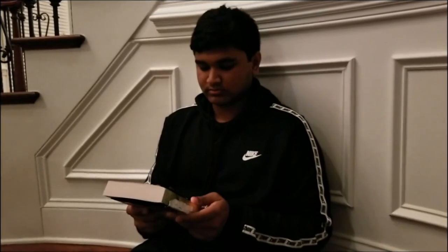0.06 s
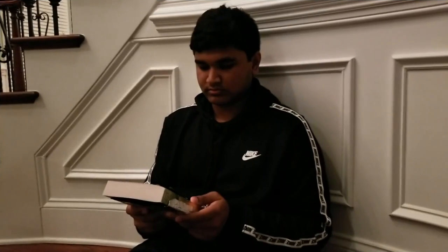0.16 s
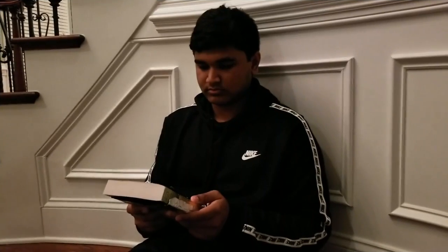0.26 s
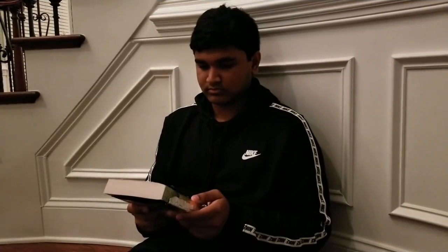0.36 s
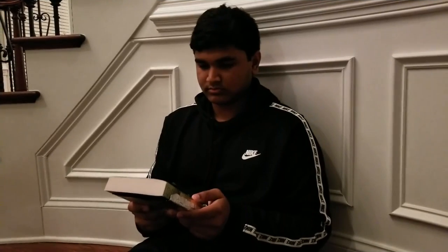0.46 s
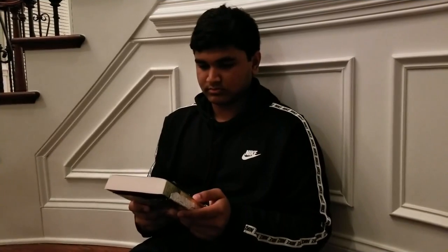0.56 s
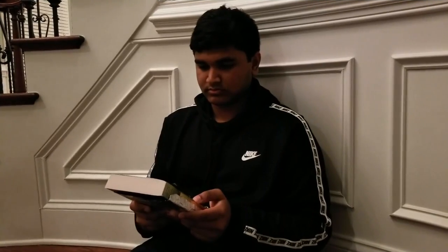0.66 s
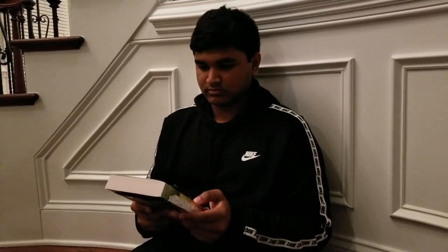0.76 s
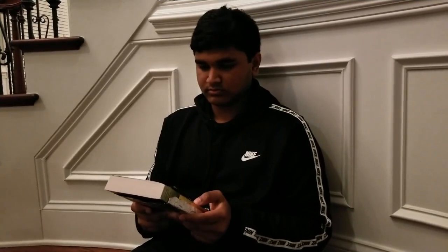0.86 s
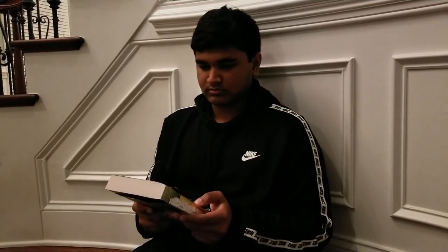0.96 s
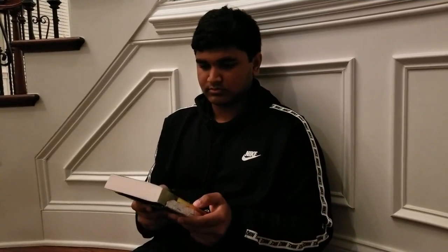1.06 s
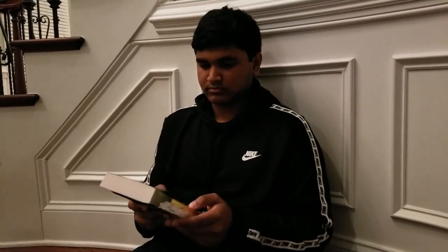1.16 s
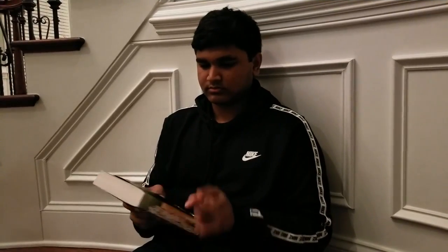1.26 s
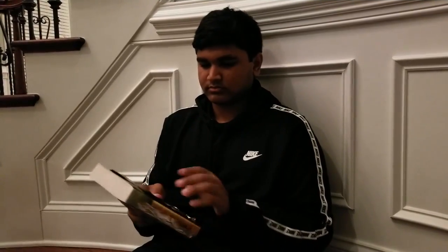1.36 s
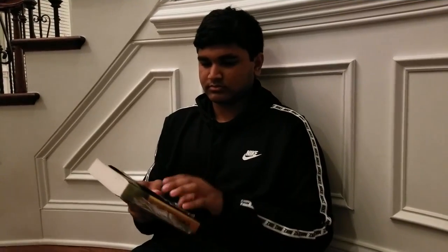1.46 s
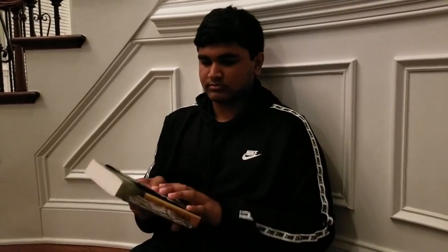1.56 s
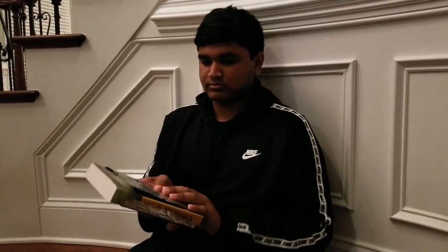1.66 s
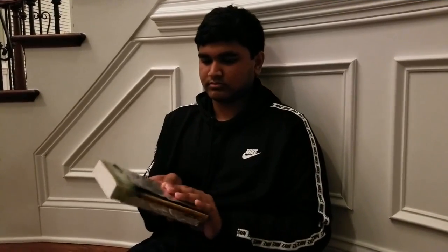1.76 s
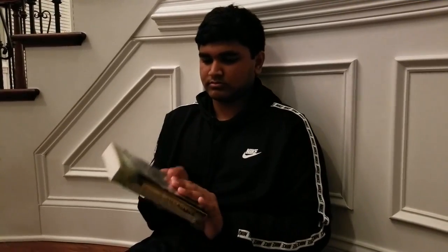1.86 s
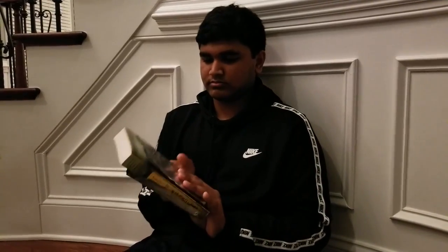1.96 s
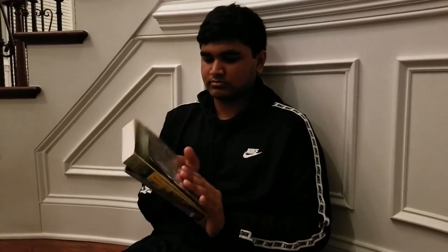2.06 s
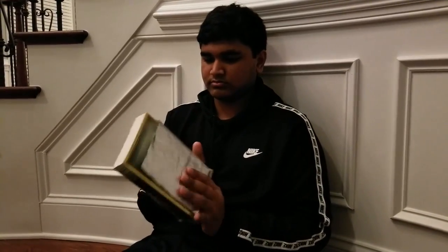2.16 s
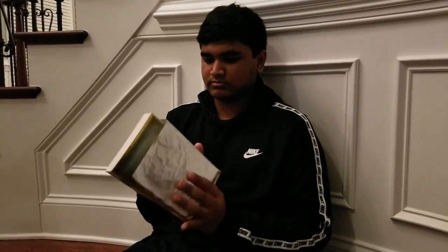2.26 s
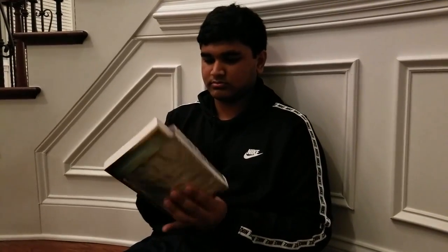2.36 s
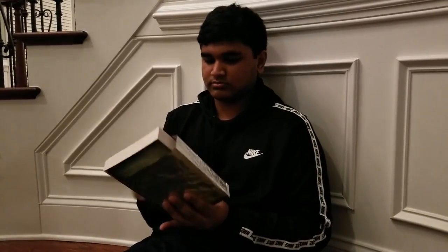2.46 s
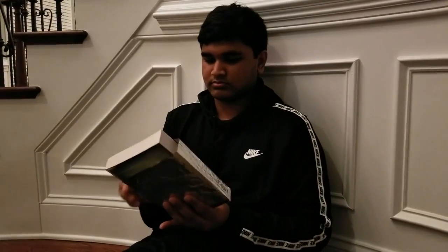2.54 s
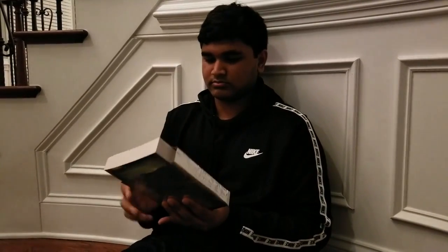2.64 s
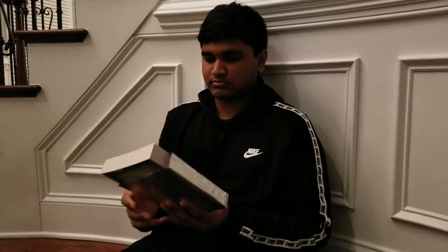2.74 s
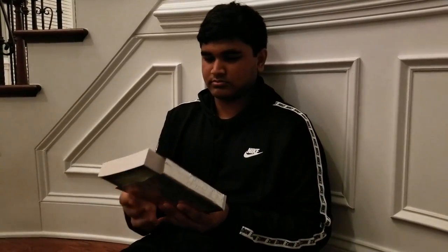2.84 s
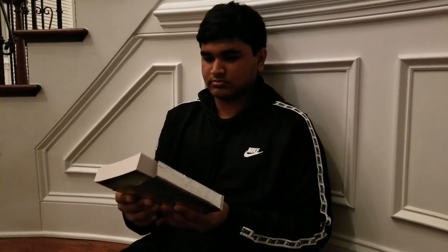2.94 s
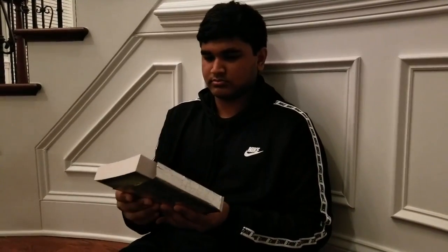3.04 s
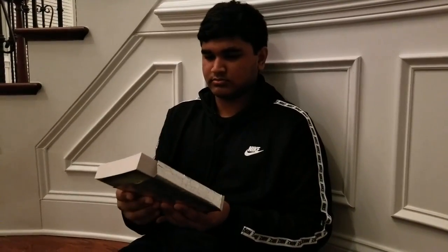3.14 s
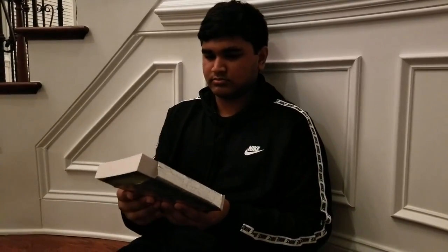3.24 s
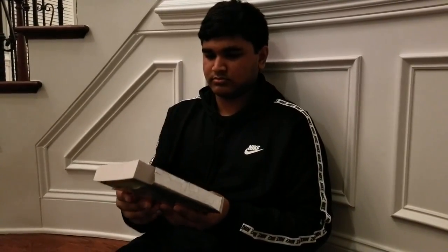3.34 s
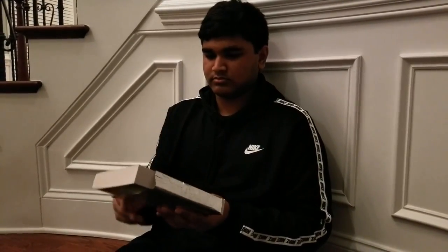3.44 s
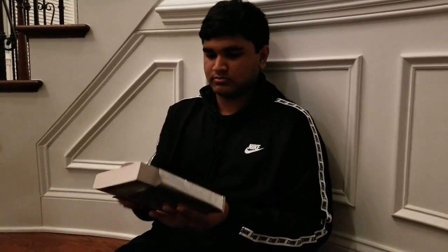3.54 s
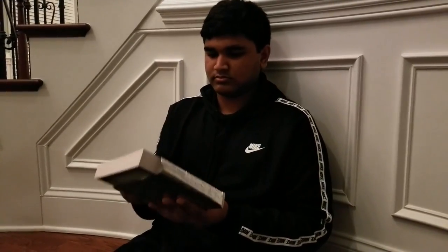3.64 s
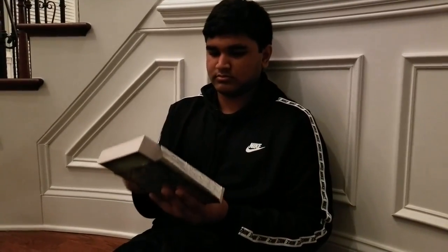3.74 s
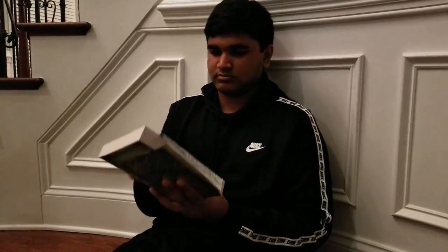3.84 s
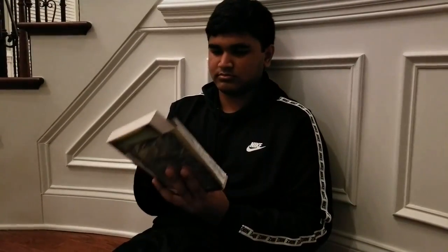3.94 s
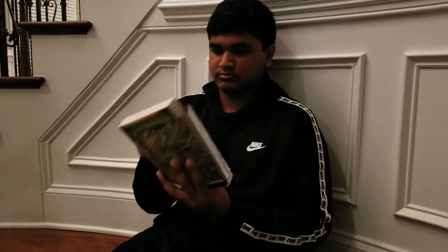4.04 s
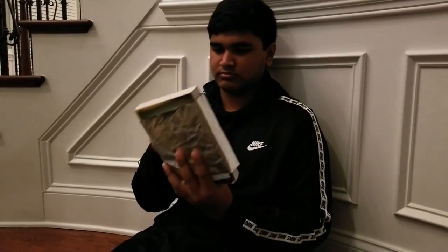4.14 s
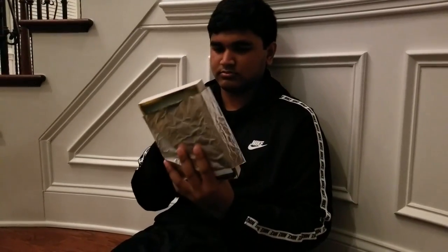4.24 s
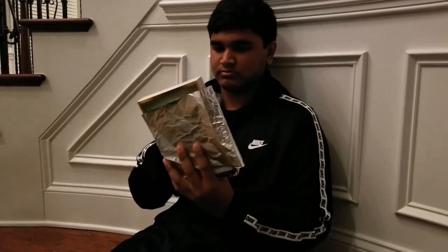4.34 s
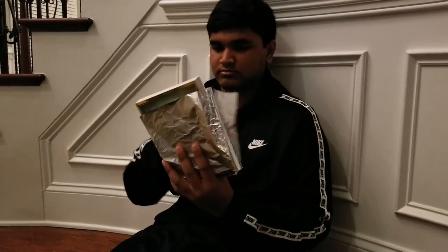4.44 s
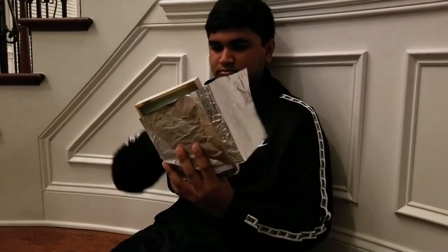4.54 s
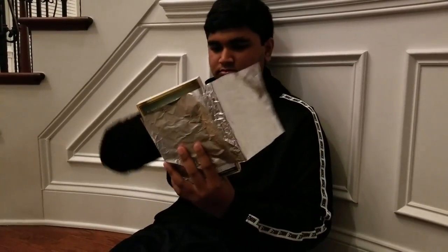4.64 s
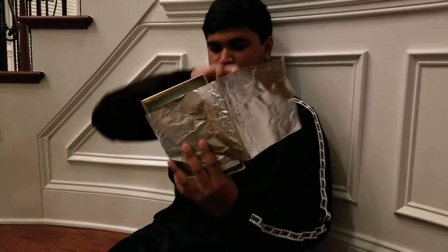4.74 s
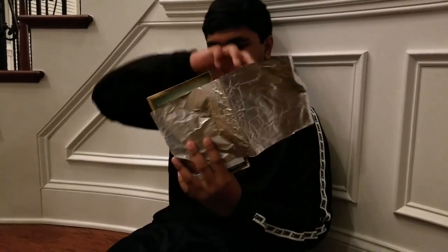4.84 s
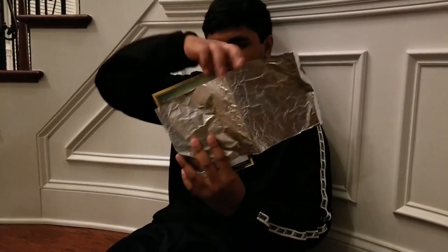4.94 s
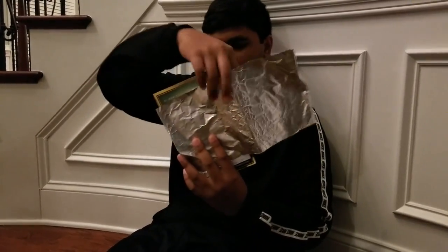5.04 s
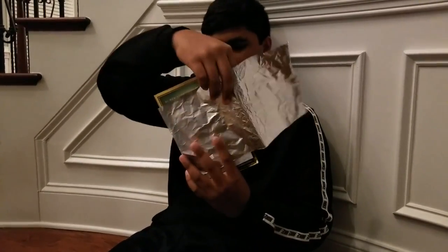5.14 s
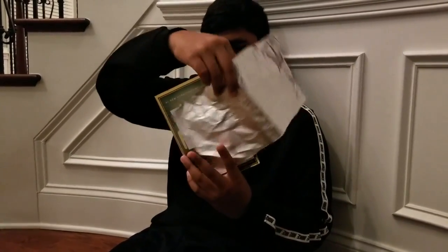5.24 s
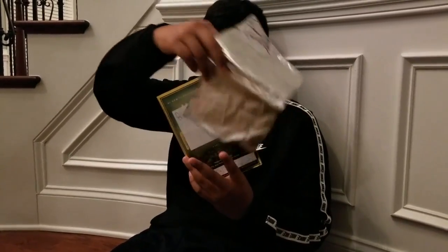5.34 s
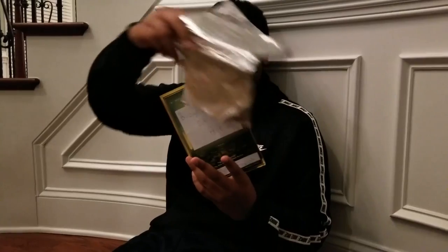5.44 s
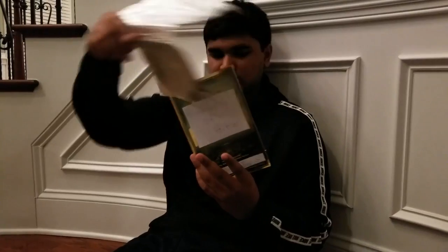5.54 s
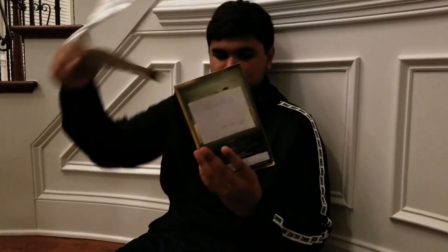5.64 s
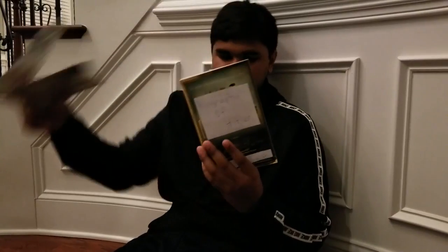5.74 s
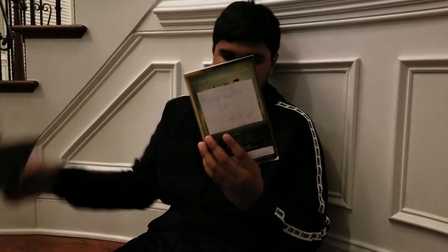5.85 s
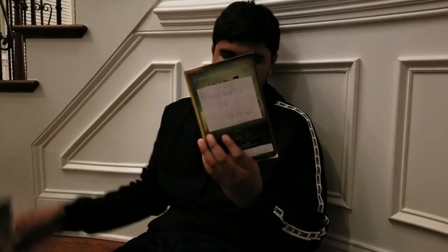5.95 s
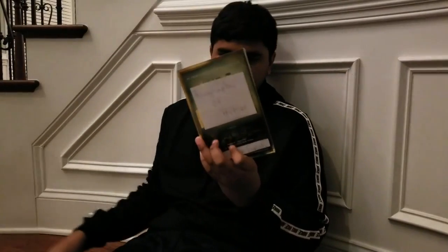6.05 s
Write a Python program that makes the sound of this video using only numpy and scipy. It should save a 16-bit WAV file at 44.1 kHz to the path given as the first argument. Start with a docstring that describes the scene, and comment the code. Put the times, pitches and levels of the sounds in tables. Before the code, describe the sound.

Close, crisp crinkling of foil gift wrap grows busier and ends in a short tear, with soft bumps on a book.

```python
"""A dull low ring and a faint crackle come first, then sharp snaps: foil wrapping paper is being picked
open on a book, close to a stereo microphone and a little to its left, in a panelled hallway.
Creases buckle singly and in showers of tiny clicks; the sheet slides and flaps, hands bump the book,
and near the end fibres part as the paper rips away. The hall answers with a short tail over a rumble."""
import sys
import numpy as np
from scipy import signal
from scipy.fft import rfft, irfft, next_fast_len
from scipy.io import wavfile
from scipy.ndimage import uniform_filter1d

SR = 44100
rng = np.random.default_rng(int(sys.argv[2]) if len(sys.argv) > 2 else 0)


def materialize(psi):
    """Save the field psi as 16-bit PCM at rate SR to the path in sys.argv[1].

    A 1-D psi becomes a single channel; in a 2-D psi each row is a channel.
    """
    bounded = np.clip(np.atleast_2d(psi).T, -1, 1)
    quanta = np.round(bounded * 32767).astype(np.int16)
    wavfile.write(sys.argv[1], SR, quanta)


N = 269010

# Crackle from the hands' pressure between strokes: time_s, level_db
HANDLING = [(0.19, -60), (0.47, -82), (0.6, -64), (0.97, -68.5), (1.3, -62), (1.48, -76), (1.7, -64),
            (1.98, -53), (2.29, -61.5), (2.55, -57.5), (2.85, -72.5), (3.15, -64), (3.38, -71.5),
            (3.82, -48), (4.27, -45), (4.59, -65), (5.92, -65), (6.1, -52)]
# Where and how the hands work, heard from the microphone: time_s, left_db, brightness_db
GRIP = [(0.19, -1.5, 21), (1.45, -1, 32), (2.15, 0, -0.5), (3.2, 1.5, -0.5), (4.15, 0.5, -5.5),
        (5.42, 1, -2), (5.62, 1.5, 5), (5.9, 2, -13), (6.1, 4, -1)]
# Slides and tugs: start_s, rise_s, hold_s, crackle_db, flex_over_crackle_db
STROKES = [(1.147, 0.054, 0.0064, -44.5, -16.5), (1.508, 0.019, 0.01, -47, -25),
           (1.537, 0.018, 0.065, -54.5, -18), (1.743, 0.14, 0.034, -47.5, -24),
           (2.044, 0.074, 0.014, -47.5, -17), (2.15, .03, 0.017, -53.5, -20),
           (2.395, 0.042, .01, -35.5, -19), (2.448, 0.0087, 0.044, -44.5, -11.5),
           (2.894, 0.025, .003, -46, -21), (2.93, 0.012, 0.052, -47, -15.5),
           (3.123, 0.045, .005, -49.5, -23), (3.219, 0.015, 0.0082, -50.5, -18),
           (3.403, 0.021, 0.006, -41, -14.5), (3.458, .005, 0.018, -54, -12),
           (3.549, 0.029, .003, -38.5, -23.5), (3.585, 0.012, 0.02, -54, -12),
           (3.652, 0.014, 0.051, -43, -9), (4.038, 0.0081, 0.0085, -35.5, -14),
           (4.052, 0.015, 0.027, -52, -15), (4.225, 0.0085, 0.07, -43, -8.5),
           (4.322, 0.011, 0.027, -45.5, -9.5), (4.365, 0.0096, 0.0032, -37.5, -12.5),
           (4.417, 0.004, 0.09, -44, -8), (4.53, 0.0048, .02, -42, -10), (4.602, .018, 0.018, -33.5, -10.5),
           (4.647, 0.0089, 0.042, -43.5, -5.5), (4.699, 0.018, .005, -35.5, -10),
           (4.738, .008, 0.077, -42.5, -9), (4.818, 0.011, 0.0058, -35, -8), (4.853, 0.012, 0.011, -43, -6),
           (4.891, 0.0065, 0.018, -39.5, -9.5), (5.076, 0.0034, 0.026, -37.5, -9),
           (5.11, 0.0049, 0.022, -33, -10.5), (5.149, .004, .03, -33, -13.5),
           (5.215, 0.0067, 0.053, -35, -15), (5.259, 0.018, 0.042, -30.5, -14),
           (5.346, 0.015, 0.18, -41.5, -16.5), (5.555, 0.051, 0.027, -37, -18.5),
           (5.643, 0.016, 0.43, -70, 0.5), (5.722, 0.0054, 0.0066, -47, -27),
           (5.843, .005, 0.014, -47.5, -14.5), (5.943, 0.02, 0.095, -50, -9),
           (6.012, 0.0074, 0.0033, -34.5, -25), (6.079, 0.0087, .02, -41, -7)]
# Creases that snap: start_s, crack_db, pitch_hz, left_db
SNAPS = [(0.3146, -35, 12000, 11), (0.365, -47.5, 10800, -3), (0.49, -49, 10100, 10),
         (0.545, -49, 10900, 8), (0.5799, -30, 11100, 1), (0.708, -48, 9900, 4), (0.751, -41, 9800, 5),
         (0.842, -43.5, 12000, 8), (0.9997, -29, 14300, 2.5), (1.1, -39.5, 11600, 1),
         (1.152, -34, 11500, 7), (1.175, -33.5, 9300, 3), (1.201, -30, 10100, 6), (1.2646, -33.5, 9700, 5),
         (1.522, -30.5, 12300, 0), (1.578, -33, 11000, 1), (1.694, -43.5, 11800, 3),
         (1.755, -29.5, 12400, 6), (1.885, -34.5, 11200, 3.5), (1.935, -30, 10200, 4.5),
         (2.056, -39.5, 10700, 6), (2.114, -27.5, 8600, 6.5), (2.209, -32, 13200, 6), (2.31, -39, 9500, 2),
         (2.39, -35.5, 8950, 6), (2.95, -28.5, 7340, 0), (3.2103, -41.5, 10900, 4), (3.275, -44, 10100, 5),
         (3.417, -32, 8460, -4), (3.4644, -36.5, 8000, 4), (3.496, -35.5, 10800, 5),
         (3.7132, -31, 7560, -5.5), (3.7474, -40, 6760, 2), (3.796, -26.5, 6900, 5.5),
         (3.824, -34.5, 7200, 4), (3.858, -33.5, 7560, 5), (3.903, -35, 8200, 1), (3.936, -37, 8000, 3),
         (4.119, -36.5, 9050, 5), (4.1781, -26.5, 9700, 3), (4.201, -23, 10500, 5.5),
         (4.216, -30, 10100, 7), (4.2774, -29.5, 9700, 5), (4.289, -23, 9800, 3), (4.385, -29.5, 8000, 9),
         (4.4271, -23.5, 8500, 2.5), (4.464, -19.5, 8200, 3), (4.4907, -31, 7350, 2),
         (4.5381, -24.5, 8400, 7), (4.618, -29.5, 7700, 9), (4.7535, -27, 8100, 3), (4.787, -24, 10100, 3),
         (4.826, -24, 9400, 0.5), (4.8985, -32, 6200, 3), (5.09, -18, 7700, 4), (5.1153, -30.5, 6500, 9),
         (5.133, -21.5, 8900, 5), (5.1484, -17.5, 8300, 0), (5.155, -18.5, 7900, 0), (5.1743, -34, 8400, 7),
         (5.595, -21, 10600, 2.5), (5.7279, -42, 7800, 1), (5.842, -39.5, 7000, 6), (5.965, -40, 6300, 8),
         (6.0164, -31, 8850, 15), (6.0931, -21, 10000, 6)]
# The three pulls that tear the paper: start_s, rise_s, hold_s, level_db
TEARS = [(5.067, .012, 0.073, -63), (5.218, 0.019, 0.305, -39.5), (5.58, .015, 0.036, -54)]
# Hands and sheet knocking on the book: start_s, level_db, pitch_hz, t60_s
BUMPS = [(1.602, -61.5, 363, 0.17), (2.093, -59.5, 403, 0.34), (4.241, -65, 456, 0.12),
         (4.635, -55.5, 483, 0.75), (4.851, -54, 98, .3), (5.08, -46.5, 140, 0.16), (5.135, -49, 162, 0.11),
         (6.089, -46.5, 330, 0.16)]
# Spectra of the crackling sheet, a snapping crease and parting fibres: frequency_hz, density_db
PAPER_COLOUR = [(200, -14), (450, -13.5), (750, -17), (1080, -10), (1400, -10.5), (1900, -7.5),
                (2700, -7.5), (3900, 5), (6300, 2), (9000, 1), (12600, 3), (15800, -7.5)]
SNAP_COLOUR = [(900, -31), (1900, -29), (3000, -19), (4200, -1), (6300, -1), (9000, -5), (12500, 0.5),
               (16000, -0.5)]
FIBRE_COLOUR = [(3000, -32), (6000, -8), (9500, -10), (12500, 2), (15800, -13)]
# Decay of the hallway: frequency_hz, t60_s
HALL_T60 = [(200, 0.98), (1000, 0.57), (4000, 0.35), (8000, 0.28), (16000, 0.14)]
# Fade of the opening low ring: time_s, level_db
LOW_RING_LEVEL = [(0.18, -65), (0.2, -51.5), (0.24, -58), (0.275, -65), (0.31, -52.5), (0.36, -65),
                  (0.46, -75), (0.7, -100)]
# Spectra of the low ring, the house rumble and the hiss: frequency_hz, density_db
LOW_RING_COLOUR = [(200, -10), (300, -9.5), (360, 4), (410, -10), (470, -10), (600, -23), (800, -38)]
RUMBLE_COLOUR = [(20, -33), (38, -0.5), (60, -2.5), (78, -6.5), (98, 0.5), (128, -9), (180, -15.5),
                 (250, -18), (440, -26), (600, -33), (1100, -51), (2000, -100)]
HISS_COLOUR = [(300, -3.5), (1000, -2), (3000, -12), (8000, -14.5), (16000, -18.5)]

FACET_T60_S, FACET_WANDER_DB = 0.066, 2.5   # a tiny buckle's ring time; wander of each facet's share
STEADY_FLEX_DB, PIVOT_DB, FLEX_GROWTH = -63, -49.5, 1.4   # flexing at the pivot level; dB per dB
FLAP_DB, TAUT_DB = -12, -6   # flapping against flexing; change when a tear holds the sheet taut
SNAP_RING_CYCLES = 234   # cycles of its pitch in which a crack dies by 60 dB
BODY_DB, BODY_DB_PER_OCTAVE = -28, -17   # panel against crack at 9 kHz; smaller facets stir it less
RELEASE_S, TEAR_SAG_DB_PER_S = 0.019, 3   # the sheet settles after a move; a running tear weakens


def sheet():
    """Close-up crackle and sliding friction; wide panels add the middle, the whole sheet the flutter."""
    crackle_gain, flex_gain, flap_gain = hand_effort()
    pan_db, bright_db = in_time(GRIP)
    clicks = evened(click_shower(per_s=480, spread_db=2.0), size=1800)
    friction = from_db(-9) * noise(PAPER_COLOUR, alike=0)
    texture = clicks + friction
    fine = band(texture, 2800, 18000)
    sparkle = signal.sosfilt(signal.butter(1, 9000, "high", fs=SR, output="sos"), fine)
    tilted = (fine - sparkle) * from_db(-bright_db / 2)
    tilted = tilted + panned(sparkle, pan_db=2.0) * from_db(bright_db / 2)
    crackle = panned(evened(tilted, size=8000) * crackle_gain, pan_db)
    flex = panned(rms_one(band(texture, 960, 2516)) * flex_gain, pan_db=7.5)
    flutter = band(texture, 250, 930)
    flutter = flutter + 0.31 * flutter[::-1]   # long waves reach both sides of the microphone
    flap = panned(rms_one(flutter) * flap_gain, pan_db=10.0)
    return crackle + flex + flap


def click_shower(per_s, spread_db, count=12):
    """Tiny buckles of uneven size come at random, dealt among ringing facets of the foil."""
    strength = from_db(spread_db * np.minimum(rng.exponential(1, N), 4))
    energy = strength ** 2 * (rng.random(N) < per_s / SR)
    dealt, out = rng.integers(0, count, N), np.zeros((2, N))
    keep = from_db(-60 / (FACET_T60_S * SR)) ** 2   # share of energy left after one sample
    for k, hz in enumerate(np.geomspace(700, 14000, count)):
        ringing = np.sqrt(signal.lfilter([1], [1, -keep], energy * (dealt == k) + 1e-18))
        tension = from_db(FACET_WANDER_DB * drift(per_s=53))   # the pull moves from facet to facet
        out += ringing * tension * facet(PAPER_COLOUR, hz, focus_db=4.5, uneven_db=7.0, size=N)
    return out


def facet(spectrum, centre_hz, focus_db, uneven_db, size):
    """One buckling facet: a dense, uneven cluster of modes around its own pitch."""
    hz = np.geomspace(200, 17000, 36)
    peak_db = focus_db * np.exp(-2 * np.log2(hz / centre_hz) ** 2)
    shape_db = at_hz(spectrum, hz) + peak_db + uneven_db * rng.standard_normal(len(hz))
    return noise(np.c_[hz, shape_db], alike=0, size=size)


def hand_effort():
    """Gains of crackle, flexing and flapping from handling and strokes; a taut sheet flaps less."""
    steady_db, = in_time(HANDLING)
    power = from_db([steady_db, STEADY_FLEX_DB + FLEX_GROWTH * (steady_db - PIVOT_DB)]) ** 2
    for start, rise, hold, crackle_db, flex_db in STROKES:
        gains = from_db([crackle_db, crackle_db + flex_db])
        add(power, start, np.outer(gains, gesture(rise, hold)) ** 2)
    crackle, flex = np.sqrt(power)
    tear = tear_strength()
    return crackle, flex, flex * from_db(FLAP_DB + TAUT_DB * tear / tear.max())


def gesture(rise, hold, sag_db_per_s=0):
    """One move of the hand: it builds up, holds, and the sheet settles."""
    t = np.arange(int((rise + hold + 10 * RELEASE_S) * SR)) / SR
    settling = np.exp(-np.maximum(t - rise - hold, 0) / RELEASE_S)
    return np.clip(t / rise, 0, 1) * from_db(-sag_db_per_s * t) * settling


def snaps(size=4000):
    """A stiff crease flips over: its facet cracks and the panel around it rings."""
    out = np.zeros((2, N))
    hz, colour_db = np.transpose(SNAP_COLOUR)
    for start, crack_db, pitch_hz, pan_db in SNAPS:
        octaves, t60 = np.log2(pitch_hz / 9000), SNAP_RING_CYCLES / pitch_hz
        body_db = crack_db + BODY_DB + BODY_DB_PER_OCTAVE * octaves
        tilt_db = 13.8 * octaves   # per octave: small facets are bright, large ones dull
        colour = np.c_[hz, colour_db + tilt_db * np.log2(np.maximum(hz / 4000, 1))]
        modes = facet(colour, pitch_hz, focus_db=1.0, uneven_db=3.0, size=size)
        crack = rms_one(band(modes, 3950, 16300)) * dying(t60, attack_s=0.0018, size=size)
        body = rms_one(band(modes, 930, 2900)) * dying(t60=0.28, attack_s=0.00024, size=size)
        add(out, start, panned(from_db(crack_db) * crack + from_db(body_db) * body, pan_db))
    return band(out, 530, 15700, order=2)


def rip(breaks_per_s=5000, fade_s=0.0005):
    """Fibres part in thousands along the tear, singly and in bundles: a ragged, bright sizzle."""
    breaks = rng.random(N) < breaks_per_s / SR
    strength = from_db(4.5 * np.minimum(rng.exponential(1, N), 3.5))
    energy = signal.lfilter([1], [1, -np.exp(-1 / (fade_s * SR))], breaks * strength ** 2 + 1e-18)
    sizzle = rms_one(noise(FIBRE_COLOUR, alike=0) * np.sqrt(energy))
    return panned(sizzle * tear_strength(), pan_db=2.5)


def tear_strength():
    """Each pull drives the tear on, weakening as it runs."""
    strength = np.zeros((1, N))
    for start, rise, hold, level_db in TEARS:
        add(strength, start, from_db(level_db) * gesture(rise, hold, TEAR_SAG_DB_PER_S)[None])
    return strength[0]


def bumps(size=14000):
    """The padded book answers a soft touch with one broad, damped resonance."""
    out = np.zeros((2, N))
    for start, level_db, hz, t60 in BUMPS:
        colour = [(hz / 3, -35), (hz / 1.23, -4), (hz, 0), (hz * 1.2, -5), (hz * 2, -28), (hz * 10, -80)]
        thud = noise(colour, alike=0.79, size=size) * dying(t60, attack_s=0.0021, size=size)
        add(out, start, panned(from_db(level_db) * thud, pan_db=3.0))
    return out


def hall(direct, wet_db, count=10):
    """Direct sound plus hallway: as the sheet moves, one pattern of echoes gives way to the next."""
    wet, place = np.zeros((2, N)), np.linspace(0, count - 1, N)
    for k in range(count):
        near = np.flatnonzero(np.abs(place - k) < 1)
        share = np.cos(np.pi / 2 * (place[near] - k))
        add(wet, near[0] / SR, signal.oaconvolve(direct[:, near] * share, reflections(), axes=1))
    return direct + from_db(wet_db) * wet


def reflections(size=30000):
    """Diffuse echoes reach the microphone from walls and floor; the treble dies first."""
    edges_hz = 125 * 2. ** np.arange(9)
    white, tail = rng.standard_normal((2, size)), np.zeros((2, size))
    for low, high in zip(edges_hz, edges_hz[1:]):
        t60 = at_hz(HALL_T60, np.sqrt(low * high))
        tail += band(white, low, high, order=2) * dying(t60, attack_s=0.00033, size=size)
    return rms_one(tail) / np.sqrt(size)


def background():
    """Room tone: house rumble, faint hiss, and a dull low ring that dies away at the start."""
    rumble = panned(from_db(-60.5) * noise(RUMBLE_COLOUR, alike=0.93), pan_db=4.0)
    hiss = from_db(-73.5) * noise(HISS_COLOUR, alike=0.1)
    low_ring = from_db(in_time(LOW_RING_LEVEL)[0]) * noise(LOW_RING_COLOUR, alike=0.73)
    return rumble + hiss + low_ring


def noise(spectrum, alike, size=N):
    """Stereo noise of a given colour and left-right likeness; rms 1."""
    padded = next_fast_len(size)
    hz = np.maximum(np.fft.rfftfreq(padded, 1 / SR), 1)
    white = rfft(rng.standard_normal((2, padded)))
    mid, side = irfft(white * from_db(at_hz(spectrum, hz)), padded)[:, :size]
    return rms_one(np.sqrt(1 + alike) * mid + np.sqrt(1 - alike) * side * [[1], [-1]])


def evened(x, size):
    """Take out the slow swell of a texture and keep its grain."""
    power = uniform_filter1d(np.mean(x ** 2, axis=0), size)
    return x / np.sqrt(np.maximum(power, 0) + np.mean(power) / 1000)


def dying(t60, attack_s, size):
    """A short rise, then an exponential decay."""
    t = np.arange(size) / SR
    return np.clip(t / attack_s, 0, 1) * from_db(-60 * np.maximum(t - attack_s / 2, 0) / t60)


def drift(per_s):
    """A random wander between knots of unit spread."""
    knots = rng.standard_normal(500)
    return np.interp(np.arange(N) / SR * per_s, np.arange(len(knots)), knots)


def band(x, low_hz, high_hz, order=3):
    """Causal band-pass."""
    edges_hz = [low_hz, min(high_hz, SR / 2 - 1)]
    return signal.sosfilt(signal.butter(order, edges_hz, "band", fs=SR, output="sos"), x)


def panned(x, pan_db):
    """Lean to the microphone's left by so many dB."""
    return x * from_db(np.reshape([pan_db / 2, -pan_db / 2], (2, -1)))


def add(out, start_s, sound):
    """Mix a sound (channels x samples) in at a time."""
    at = min(int(start_s * SR), N - 1)
    out[:, at:at + sound.shape[1]] += sound[:, :N - at]


def in_time(rows):
    """Each column of a curve, sample by sample."""
    time_s, *columns = np.transpose(rows)
    return [np.interp(np.arange(N) / SR, time_s, column) for column in columns]


def at_hz(points, hz):
    """Read a table on a log-frequency axis."""
    known_hz, value = np.transpose(points)
    return np.interp(np.log(hz), np.log(known_hz), value)


def from_db(db):
    """Decibels to gain."""
    return 10 ** (np.asarray(db) / 20)


def rms_one(x):
    """Scale to unit power."""
    return x / np.sqrt(np.mean(x ** 2) + 1e-20)


def scene():
    """Paper and book close to the microphone, the hallway behind them."""
    return hall(sheet() + rip() + snaps() + bumps(), wet_db=-10) + background()


def record(dry, start_s=0.186, cutoff_hz=16000):
    """Sound begins after a moment of silence; the top treble is cut steeply."""
    running = np.arange(N) / SR > start_s
    return signal.sosfilt(signal.ellip(10, .2, 80, cutoff_hz, fs=SR, output="sos"), dry * running)


dry = scene()
out = record(dry)
materialize(out)
```